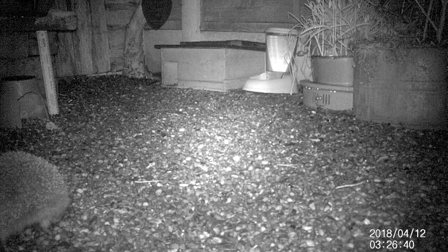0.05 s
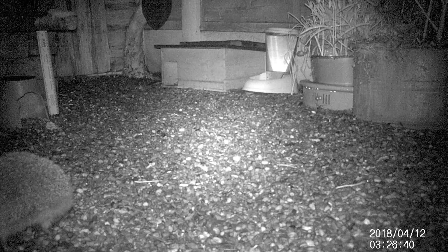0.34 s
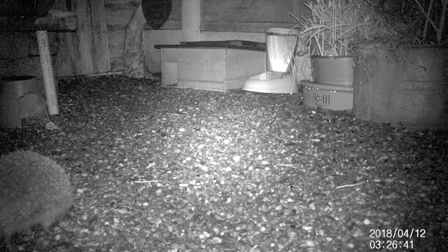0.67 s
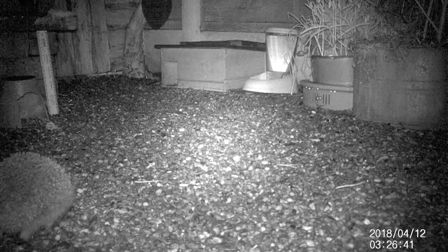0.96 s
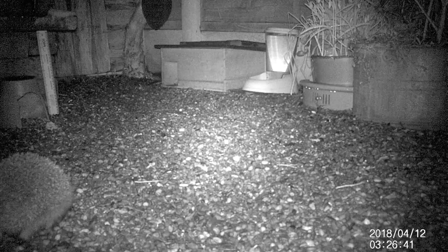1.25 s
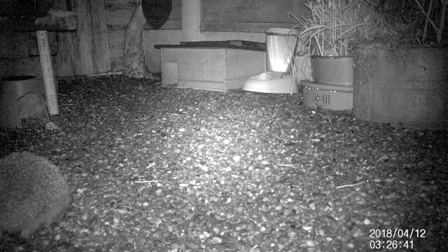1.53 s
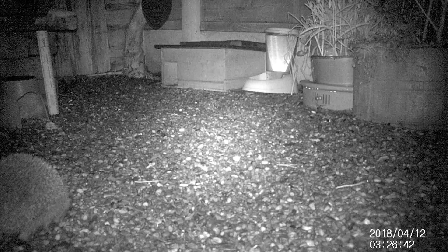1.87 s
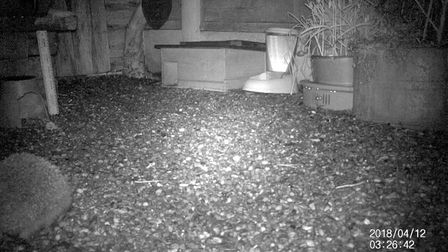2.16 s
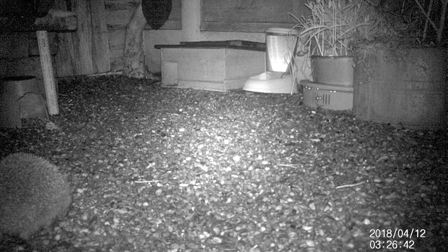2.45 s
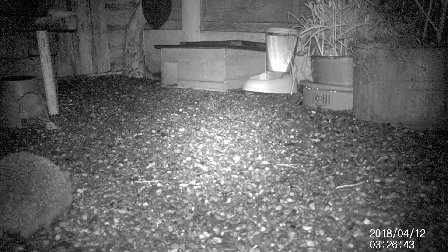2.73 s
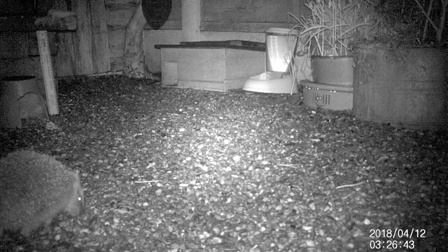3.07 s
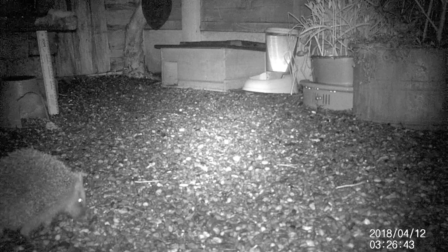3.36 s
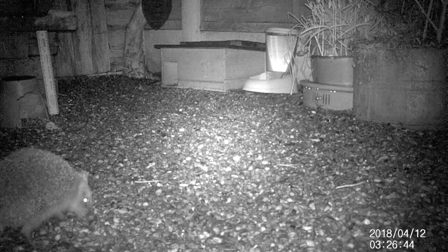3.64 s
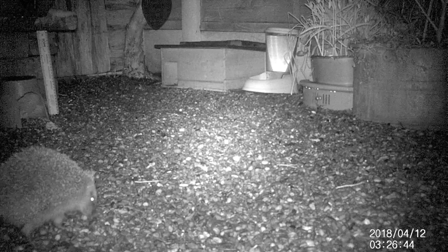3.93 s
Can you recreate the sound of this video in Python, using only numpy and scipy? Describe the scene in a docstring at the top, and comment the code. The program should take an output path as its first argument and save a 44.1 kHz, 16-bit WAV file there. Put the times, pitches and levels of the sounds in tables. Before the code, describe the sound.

Faint gravel crackles and clicks from a foraging hedgehog, with hiss and low rumble beneath.

```python
"""Hedgehog on gravel at night

A hedgehog noses over gravel near a trail camera. Each shove of its feet sets off a small slide
of stone clicks, with a few sharper knocks, all ringing the microphone's narrow treble peak.
Underneath lies a bed of steady recorder hiss, low flutter and a faint hollow drone."""
import sys
import numpy as np
from scipy import signal
from scipy.fft import rfft, irfft
from scipy.io import wavfile
from scipy.ndimage import uniform_filter1d

SR = 44100
rng = np.random.default_rng(int(sys.argv[2]) if len(sys.argv) > 2 else 0)


def unload_audio(sound):
    """Save the sound as a 16-bit wav file, at the path given as the first command line argument."""
    columns = np.transpose(np.atleast_2d(sound))
    # keep every value between -1 and 1, then stretch to whole-number steps
    steps = np.round(np.clip(columns, -1, 1) * 32767)
    wavfile.write(sys.argv[1], SR, steps.astype(np.int16))


N = 176400


def amp(db):
    """Decibels to linear gain."""
    return 10 ** (np.asarray(db) / 20)


def unit(x):
    """Scales to rms 1."""
    return x / np.sqrt(np.mean(x ** 2) + 1e-20)


def noise(gain_at):
    """Noise of rms 1 whose spectrum follows a function of frequency."""
    spectrum = rfft(rng.standard_normal(N)) * gain_at(np.fft.rfftfreq(N, 1 / SR))
    return unit(irfft(spectrum, N))


def coloured(curve):
    """Noise of rms 1 shaped by an EQ curve of (freq_hz, relative_db) points."""
    freq_hz, relative_db = np.transpose(curve)
    return noise(lambda hz: amp(np.interp(np.log(hz + 1), np.log(freq_hz + 1), relative_db)))


def band(centre_hz, width_hz):
    """One steep-sided band of noise; centred on 0 Hz it is a slow random drift."""
    return noise(lambda hz: 1 / (1 + ((hz - centre_hz) / width_hz) ** 2 * 2) ** 2)


def flutter(level_db=-34, throb_top_hz=51.8, evenness=0.38):
    """Low rumble whose deepest part throbs at a fairly even strength."""
    # Tone of the rumble: freq_hz, relative_db
    rumble_curve = [(3, -9), (12, -4), (21, -0.5), (28, 1.5), (36, -4), (48, -17), (62, -12.5), (85, -18.5),
                    (110, -18), (140, -20.5), (170, -39), (400, -89)]
    rumble = coloured(rumble_curve)
    sub = irfft(rfft(rumble) * (np.fft.rfftfreq(N, 1 / SR) < throb_top_hz), N)
    envelope = uniform_filter1d(abs(signal.hilbert(sub)), size=1500)
    throb = sub.std() * unit(sub / envelope ** evenness)  # compressed, at the same rms
    return amp(level_db) * (rumble - sub + throb)


def recorder_hiss(level_db=-46, waver_db=0.33):
    """The recorder's steady noise floor, wavering very slightly in level."""
    # Tone of the hiss: freq_hz, relative_db
    hiss_curve = [(20, -75.5), (150, -60.5), (260, -62), (400, -63), (600, -66), (800, -67.5),
                  (1200, -70.5), (2000, -74), (3200, -77), (4000, -77), (4700, -77), (5100, -83),
                  (5500, -89), (5900, -101), (6300, -118)]
    return amp(level_db + waver_db * band(0, width_hz=4)) * coloured(hiss_curve)


def drone(hum_db=-50.5, swell_s=.034, wander_hz=7, waver_db=2):
    """A faint hollow hum with short, unevenly spaced swells, and fainter bands that waver."""
    # Noise bands of the main hum: pitch_hz, width_hz, relative_db
    hum_bands = [(188, 28, -2), (219, 26, -6)]
    # Brief tonal swells of the hum: peak_s, peak_db, pitch_hz
    swells = [(.06, -41, 210), (0.139, -39.5, 184), (.337, -46, 190), (.55, -47.5, 197), (.70, -50, 197),
              (.93, -48.5, 188), (1.185, -39, 198.5), (1.351, -36.5, 182.5), (1.519, -43, 196),
              (1.67, -42.5, 201), (1.841, -40, 192), (2.04, -42, 205), (2.266, -45.5, 199),
              (2.427, -43, 195), (2.588, -46, 202), (2.96, -52, 200), (3.631, -40, 195),
              (3.773, -43.5, 191)]
    # Fainter bands that colour the drone: pitch_hz, width_hz, level_db
    faint_bands = [(111.7, 10, -55.5), (309.8, 4.5, -67), (570.6, 55, -63)]
    t = np.arange(N) / SR
    hum = amp(hum_db) * sum(amp(db) * band(hz, width) for hz, width, db in hum_bands)
    wander_cycles = np.cumsum(wander_hz * band(0, width_hz=20)) / SR
    for peak_s, peak_db, pitch_hz in swells:
        envelope = amp(peak_db) * np.exp(-((t - peak_s) / swell_s) ** 2)
        hum += envelope * np.sin(2 * np.pi * (pitch_hz * t + wander_cycles))
    waver = amp(waver_db * band(0, width_hz=1.3))
    return hum + waver * sum(amp(db) * band(hz, width) for hz, width, db in faint_bands)


def microphone_ring(clicks, pitch_hz, width_hz=480):
    """The microphone's treble peak turns each click into a short ping with a soft attack."""
    t = np.arange(256) / SR
    ping = t * np.exp(-np.pi * width_hz * t) * np.sin(2 * np.pi * pitch_hz * t)
    return signal.oaconvolve(clicks, ping)[:len(clicks)]


def microphone_rolloff(x, cutoff_hz=5580):
    """The microphone's response falls steeply just above its treble peak."""
    return signal.sosfilt(signal.butter(8, cutoff_hz, fs=SR, output="sos"), x)


def stone_clicks(clicks_per_s, pitch_hz, voices=3, detune=.014, spread_db=4.5):
    """Stones tick at random and with uneven force, in a few slightly detuned voices."""
    out = np.zeros(N)
    for side in np.linspace(-1, 1, voices):
        force = amp(spread_db * np.minimum(rng.exponential(1, N), 2))
        polarity = rng.choice([-1, 1], N)
        hits = rng.random(N) < clicks_per_s / voices / SR
        out += microphone_ring(force * polarity * hits, pitch_hz * (1 + detune * side))
    return unit(out)


def gravel(trim_db=-3, stray_db=-68.5, roundness=1.2):
    """Each shove of a foot swells and dies as a slide of clicks; stray stones tick in between."""
    # Shoves in the gravel: peak_s, rise_s, fall_s, relative_db, pitch_hz
    shoves = [(0.21, .03, 0.022, -54.5, 4580), (.235, .01, 0.012, -53, 4600),
              (.418, 0.013, 0.011, -42, 4560), (.46, 0.041, 0.19, -56, 4640),
              (.568, .011, 0.02, -46.5, 4500), (.679, 0.017, 0.0074, -45.5, 4460),
              (.696, 0.0045, 0.013, -41, 4500), (0.709, .011, 0.014, -40, 4640),
              (.759, .003, 0.012, -46.5, 4660), (.782, 0.0045, 0.011, -44.5, 4530),
              (.815, .01, 0.018, -49, 4760), (1.148, 0.04, 0.016, -51, 4540),
              (1.22, 0.04, 0.016, -51.5, 4550), (1.249, 0.0099, 0.015, -45.5, 4550),
              (1.270, 0.0063, 0.013, -47, 4610), (1.581, .005, .012, -47, 4560),
              (1.692, .003, 0.0062, -51, 4670), (1.743, 0.034, 0.018, -48, 4490),
              (1.769, .007, .009, -47.5, 4600), (1.815, .012, 0.036, -56, 4570),
              (2.04, 0.0089, 0.033, -55, 4740), (2.287, .005, .01, -48, 4600),
              (2.301, 0.0035, 0.0094, -49.5, 4500), (2.467, 0.0038, 0.02, -50.5, 4700),
              (2.53, .03, .025, -56, 4700), (2.808, 0.006, 0.013, -50.5, 4630),
              (2.83, 0.008, .008, -49, 4570), (3.0, 0.011, .008, -50.5, 4600),
              (3.5, .006, 0.0074, -51, 4630), (3.546, 0.0017, 0.004, -47, 4600),
              (3.6, 0.0035, .008, -55, 4650), (3.69, .006, .008, -59, 4650),
              (3.855, .004, 0.0055, -45, 4530), (3.91, 0.016, .02, -58, 4580),
              (3.981, .002, 0.0031, -49, 4700)]
    t = np.arange(N) / SR
    out = amp(stray_db) * stone_clicks(clicks_per_s=150, pitch_hz=4670)
    for peak_s, rise_s, fall_s, relative_db, pitch_hz in shoves:
        from_peak = np.maximum((peak_s - t) / rise_s, (t - peak_s) / fall_s).clip(0, 20)
        push = np.exp(-from_peak ** roundness)  # above 1: rounder top, shorter tail
        slide = unit(push * stone_clicks(clicks_per_s=2600, pitch_hz=pitch_hz))
        push_rms = np.sqrt(np.mean(push ** 2))
        out += amp(relative_db + trim_db) * push_rms * slide
    return out


def stone_knocks(pitch_hz=4640):
    """Single stones knock together within the shoves, each ringing the treble peak once."""
    # Stone-on-stone strikes: start_s, peak_db (ahead of the microphone's roll-off)
    strikes = [(.410, -37.5), (.416, -35), (0.4192, -37), (0.6925, -31.5), (0.702, -39), (0.7083, -37.5),
               (.7775, -40.5), (0.7833, -39), (0.807, -43), (1.2666, -37.5), (1.276, -47), (1.690, -42),
               (1.7633, -41), (2.285, -45.5), (3.8515, -45.5)]
    clicks = np.zeros(N)
    for start_s, peak_db in strikes:
        clicks[round(start_s * SR)] += amp(peak_db)
    ping_peak = abs(microphone_ring(signal.unit_impulse(N), pitch_hz)).max()
    return microphone_ring(clicks, pitch_hz) / ping_peak


def scene():
    """Mono mix: the hedgehog's footwork over the bed of drone, hiss and flutter."""
    footwork = microphone_rolloff(gravel() + stone_knocks())
    return (footwork + drone() + recorder_hiss() + flutter())[None]


def record(dry):
    """A brief silence, then the sound cuts in with a click, on a small DC offset, without top end."""
    silence_s, dc_offset, cutoff_hz = .036, .0465, 6300
    sounding = np.arange(N) / SR > silence_s
    lowpass = signal.firwin(401, cutoff_hz, window=("kaiser", 9), fs=SR)
    return signal.oaconvolve((dry + dc_offset) * sounding, lowpass[None], "same")


dry = scene()
out = record(dry)
unload_audio(out)
```